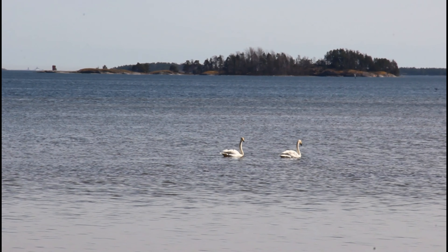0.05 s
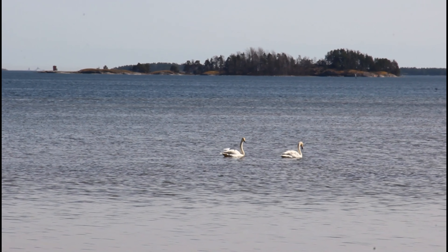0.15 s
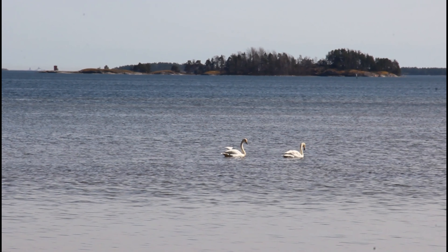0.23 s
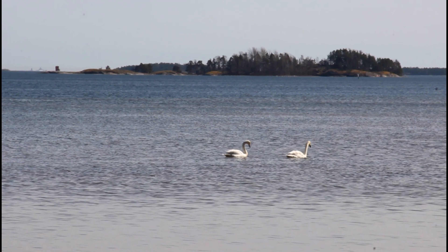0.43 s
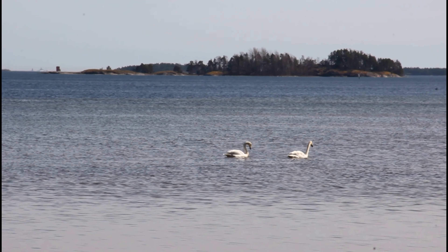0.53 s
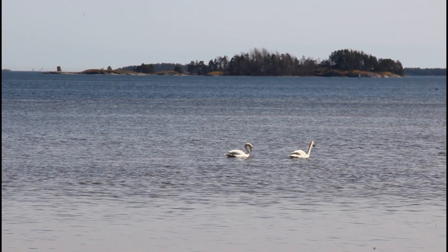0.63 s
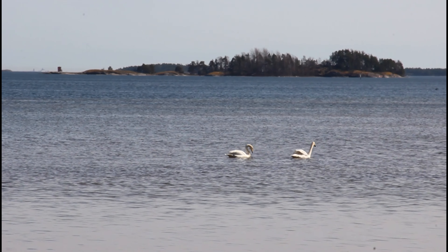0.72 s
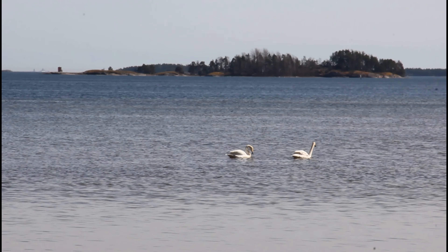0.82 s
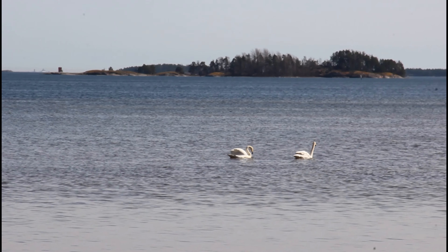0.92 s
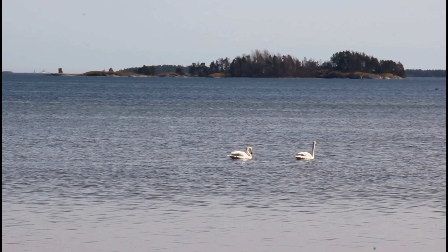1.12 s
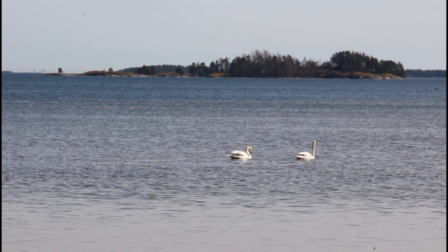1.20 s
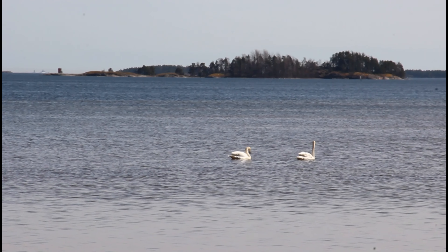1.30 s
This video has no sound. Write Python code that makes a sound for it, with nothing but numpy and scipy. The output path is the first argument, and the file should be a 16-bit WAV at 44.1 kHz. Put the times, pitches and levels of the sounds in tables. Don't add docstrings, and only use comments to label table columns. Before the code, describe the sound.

Swans honk loudly across open water: two joined nasal calls, then a burst of overlapping honks

```python
import sys
import numpy as np
from scipy import signal
from scipy.fft import rfft, irfft, next_fast_len
from scipy.io import wavfile
from scipy.ndimage import uniform_filter1d, map_coordinates

SR = 44100
rng = np.random.default_rng(int(sys.argv[2]) if len(sys.argv) > 2 else 0)


def waveform_to_disk(signal):
    frames = np.transpose(np.atleast_2d(signal))
    scaled = np.clip(frames, -1, 1) * 32767
    samples = np.round(scaled).astype(np.int16)
    wavfile.write(sys.argv[1], SR, samples)


def how_loud(loudness_db):
    steps = np.asarray(loudness_db, float) / 20
    return 10 ** steps


N = 59535
TIME_S = np.arange(N) / SR


def unit(x):
    return x / np.sqrt(np.mean(x ** 2) + 1e-20)


def along(points, hz):
    f, v = np.transpose(points)
    return np.interp(np.log(hz + 1), np.log(f + 1), v)


def wobble(rate_hz):
    knots = rng.standard_normal(int(N * rate_hz / SR) + 4)
    return map_coordinates(knots, [np.arange(N) * rate_hz / SR])


def oscillator_phase(hz):
    return 2 * np.pi * np.cumsum(hz) / SR


def filtered(x, response):
    m = next_fast_len(N + SR // 2)
    return irfft(rfft(x, m) * response(np.fft.rfftfreq(m, 1 / SR)), m)[..., :N]


# frequency in Hz, level in dB per Hz.
FLOOR_COLOUR = [(22, -22), (60, -8.5), (250, -3.5), (650, -4.5), (1100, -9), (3100, -12.5), (8000, -19.5),
                (15700, -21.5)]
# centre in Hz, width in Hz, boost in dB.
DRONE_HUMPS = [(833, 18.5, 6.5), (1226, 130, 4), (1546, 64, 7), (700, 260, 5.5)]


def air():
    floor_db, swell_db, patch_db = -54.5, 0.4, 0.85
    hum_hz, hum_db = 43, -68.5
    z = signal.stft(rng.standard_normal(N), nperseg=512)[2]
    patches = uniform_filter1d(rng.standard_normal(z.shape), size=6, axis=0)
    patches = uniform_filter1d(patches, size=14, axis=1)
    noise = signal.istft(z * how_loud(patch_db * unit(patches)), nperseg=512)[1][:N]

    def colour(f):
        drone_db = sum(db * np.exp(-((f - c) / w) ** 2) for c, w, db in DRONE_HUMPS)
        return how_loud(along(FLOOR_COLOUR, f) + drone_db)

    hum = how_loud(hum_db + 1.7 * wobble(6)) * np.sin(oscillator_phase(hum_hz * (1 + .03 * wobble(5.3))))
    return how_loud(floor_db + swell_db * wobble(4.8)) * unit(filtered(noise, colour)) + hum


def small_bird():
    start_s, length_s, from_hz, to_hz, level_db = .138, .032, 2850, 3150, -60
    u = np.clip((TIME_S - start_s) / length_s, 0, 1)
    hz = from_hz + (to_hz - from_hz) * u
    return how_loud(level_db) * np.sin(np.pi * u) * np.sin(oscillator_phase(hz))


def scatter(start_s, t60_s):
    decay = (TIME_S > start_s) * how_loud(-60 * np.abs(TIME_S - start_s) / t60_s)
    spikes = np.abs(rng.standard_normal(N)) ** 3 * rng.choice([-1, 1], N)
    answer = decay * spikes
    return answer / np.linalg.norm(answer)


# frequency in Hz, level in dB.
SHORE_COLOUR = [(500, -5), (1300, -3.5), (2500, -5), (8000, -21)]


def shore(x):
    near = how_loud(-26) * scatter(0.0044, .1)
    slap = how_loud(-24) * scatter(.1, .04)
    tail = how_loud(-26) * scatter(0.026, 1.3)
    echoes = signal.fftconvolve(x, near + slap + tail)[:N]
    return filtered(echoes, lambda f: how_loud(along(SHORE_COLOUR, f)))


# frequency in Hz, level in dB.
THROAT_COLOUR = [(450, -33), (800, 5), (1200, -15), (2700, -18), (4500, -21), (7000, -39)]


def honk(rows, tones, flutter_hz, breath_db, ragged_db, track):
    jitter, shimmer_db, spill = 0.001, 0.38, .5
    bill_db, bill_width_hz = 10, 280
    s, _, *cols = np.transpose(rows)
    curves = [uniform_filter1d(np.interp(TIME_S, s, c), size=300) for c in cols]
    level_db, bright_db, depth, bill_hz = curves
    hz = uniform_filter1d(np.interp(TIME_S, *np.transpose(track)[:2]), size=400)
    gate = np.clip(np.minimum(TIME_S - s[0], s[-1] - TIME_S) / 0.0057 + .5, 0, 1)
    phase = oscillator_phase(hz * (1 + jitter * wobble(150)))
    flutter = np.sin(beat := oscillator_phase(flutter_hz * (1 + 0.027 * wobble(40.3))))
    lowest = tones[0][0]
    tone = 0
    for k, tone_db in tones:
        db = tone_db + bright_db * np.log2(k / lowest)
        db = db + shimmer_db * k * wobble(49.84) + ragged_db * np.sqrt(k) * wobble(140)
        db = db + bill_db * np.exp(-((k * hz - bill_hz) / bill_width_hz) ** 2)
        tone = tone - how_loud(db) * np.cos(k * phase) * (1 + (k > 1) * spill * depth * flutter)
    side_tone = (lowest == 1) * depth * np.sin(phase + beat)
    hiss = filtered(rng.standard_normal(N), lambda f: how_loud(along(THROAT_COLOUR, f)))
    breath = how_loud(breath_db) * unit(hiss) * (1 + flutter)
    return gate * how_loud(level_db) * (np.sqrt(2) * (tone + side_tone) + breath)


# time in seconds, pitch in Hz, level in dB, brightness in dB per octave,
# flutter depth 0-1, bill resonance in Hz.
LONG_HONK = [
    (.198, 628, -67, -36, 0.3, 3400),
    (0.216, 642.5, -37.5, -5, 0.14, 3400),
    (0.226, 630.8, -33.5, 0, 0.27, 3410),
    (0.257, 630.2, -32, -0.5, 0.1, 3300),
    (.266, 625.5, -34.5, 1, 0, 4380),
    (.29, 621, -34, 0, 0.05, 4370),
    (0.323, 619, -34, -4.5, 0.03, 3140),
    (.372, 612.7, -41, -3, 0.15, 2470),
    (0.392, 604.4, -45.5, -31, 0.17, 2500),
]
SWELLING_HONK = [
    (.39, 606, -45.5, -8, .02, 2500),
    (.412, 610, -44, -9, .02, 2500),
    (.43, 628, -37.5, -1, 0.026, 2970),
    (.455, 639.2, -34, 0, 0.048, 3200),
    (0.483, 645.3, -32, 1.5, .03, 4000),
    (0.507, 626.8, -34.5, .5, 0.017, 3523),
    (.523, 604, -41.5, -1, .02, 3000),
    (0.534, 603, -46.5, -9, .02, 3000),
    (.553, 605, -51, -16, 0.024, 3000),
]
ARCHING_HONK = [
    (.598, 567.4, -64, -14, .03, 2200),
    (.61, 599.8, -45.5, -0.5, .03, 2180),
    (0.629, 642, -32, -3.5, .03, 2320),
    (.652, 664.6, -34.5, .5, .03, 2760),
    (0.68, 640.7, -30, -3, .05, 2893),
    (.688, 621.5, -63, -3, 1, 3300),
    (0.709, 582.6, -50, 4, 0.6, 3300),
    (0.729, 552, -58, -1, .5, 3300),
    (0.739, 557, -70, 3, .05, 3300),
]
BARK_HONK = [
    (.6, 736, -62, 3, .1, 2200),
    (0.613, 726, -37.5, 0, 0.086, 2200),
    (0.62, 734, -22.5, -10.5, 0.1, 2200),
    (0.632, 723, -25.5, 3.5, 0.16, 2200),
    (.645, 733, -30, -15, 0.26, 2200),
    (.66, 734, -41, -12, .3, 2200),
    (.675, 694, -55, -6, 0.27, 2200),
    (.69, 730, -67, -8, .2, 2200),
]
RASP_VOICE = [
    (0.613, 721, -73, -5, .3, 2800),
    (.622, 713, -55.5, 6.5, .5, 2800),
    (0.632, 700, -49, -7, .6, 2800),
    (.647, 662, -59, -19, 0.76, 2760),
    (0.665, 723, -58, -9, .7, 2800),
    (0.68, 690, -84, -12, .5, 2800),
]
LOW_HONK = [
    (0.65, 611.9, -41, -7, .05, 3700),
    (.664, 602, -40, -2.5, .05, 3700),
    (0.679, 617, -35.5, 1, .03, 3700),
    (0.691, 616, -33, -2.5, .02, 2450),
    (0.707, 595, -36.5, -2.5, .02, 2800),
    (.724, 616, -49, -6, 0.045, 2800),
    (.745, 612.6, -51, -5, 0.47, 2800),
    (.775, 613, -54, -14, 0.65, 2800),
    (.812, 628, -65, -19, 0.26, 2800),
]
# multiple of the pitch, level in dB.
LONG_OVERTONES = [(1, 0.5), (2, 0), (3, -13), (4, -36), (5, -30), (6, -37), (7, -40.5), (8, -42)]
SWELL_OVERTONES = [(1, 0), (2, -4.5), (3, -8), (4, -18.5), (5, -36.5), (6, -38), (7, -33)]
ARC_OVERTONES = [(1, -6), (2, 1.5), (3, -15), (4, -28.5), (5, -31.5)]
BARK_OVERTONES = [(1, -1.5), (2, -26.5), (3, -39.5)]
RASP_OVERTONES = [(3.6, -9.5), (4, -10.5), (5, -8), (6.4, -16)]
LOW_OVERTONES = [(1, 0), (2, -9.5), (3, -12), (4, -33), (6, -35.5)]
MEMBRANE_HZ = [121.2, 251.6, 110, 110, 110, 110]
BREATH_LEVEL_DB = [-32, -27, -27, -27.5, -6, -27]
ROUGHNESS_DB = [.1, .1, .5, .8, 2.2, .7]


def swans():
    voices = [LONG_HONK, SWELLING_HONK, ARCHING_HONK, BARK_HONK, RASP_VOICE, LOW_HONK]
    tones = [LONG_OVERTONES, SWELL_OVERTONES, ARC_OVERTONES, BARK_OVERTONES, RASP_OVERTONES, LOW_OVERTONES]
    one_breath = LONG_HONK + SWELLING_HONK[1:]
    tracks = [one_breath, one_breath] + voices[2:]
    calls = zip(voices, tones, MEMBRANE_HZ, BREATH_LEVEL_DB, ROUGHNESS_DB, tracks)
    crack_s, crack_hz, crack_length_s, crack_db = .663, 1070, .0035, -38.5
    crack_shape = np.exp(-((TIME_S - crack_s) / crack_length_s) ** 2)
    crack = how_loud(crack_db) * crack_shape * np.sin(2 * np.pi * crack_hz * TIME_S)
    return sum(honk(*call) for call in calls) + crack


def scene():
    birds = swans()
    return (birds + shore(birds) + small_bird() + air())[None]


def roll_off(x):
    return signal.sosfilt(signal.butter(12, 16090, fs=SR, output="sos"), x)


def record(dry):
    top_hz, offset = 15760, 0.00078
    mix = filtered(dry, lambda hz: hz < top_hz) + offset
    return roll_off(mix)


dry = scene()
out = record(dry)
waveform_to_disk(out)
```